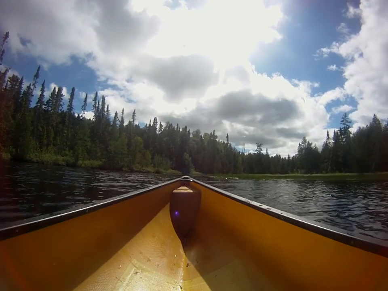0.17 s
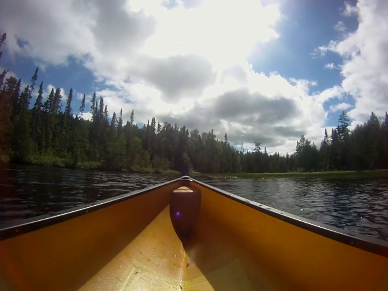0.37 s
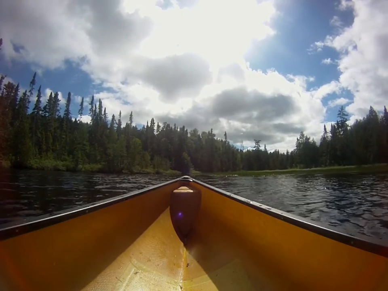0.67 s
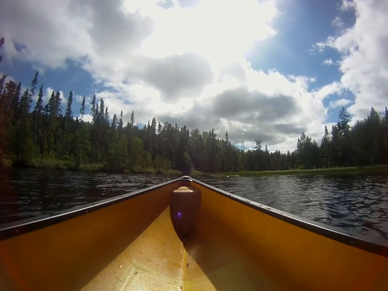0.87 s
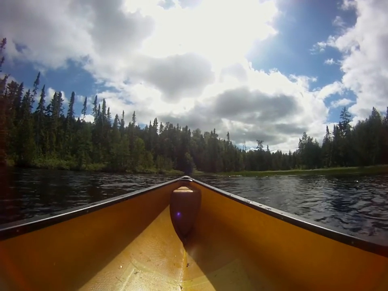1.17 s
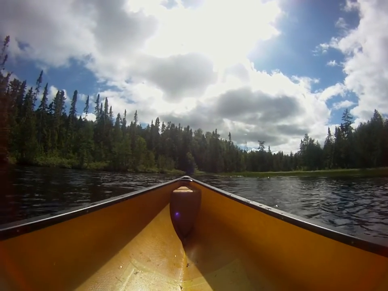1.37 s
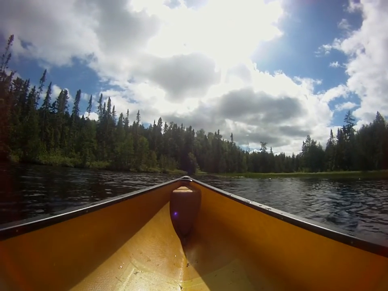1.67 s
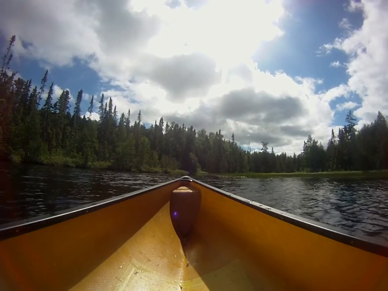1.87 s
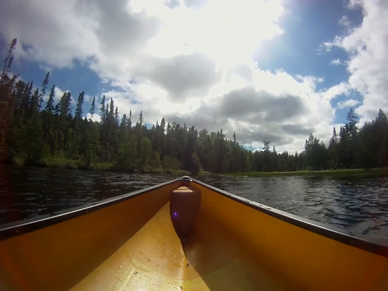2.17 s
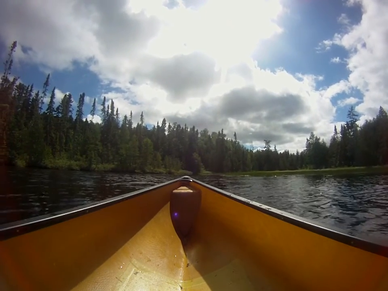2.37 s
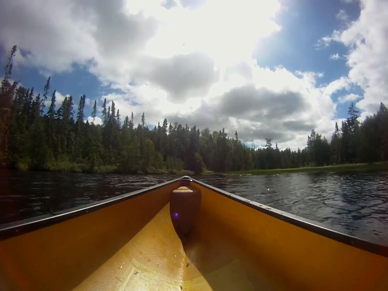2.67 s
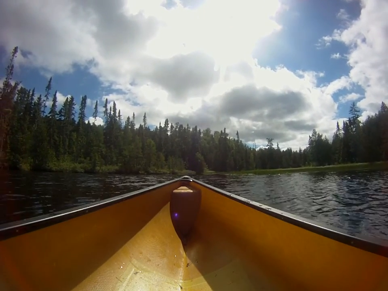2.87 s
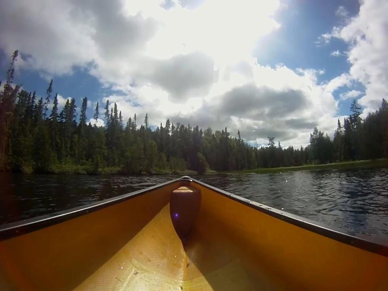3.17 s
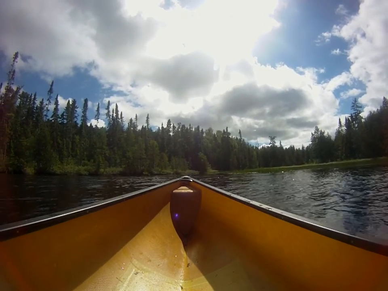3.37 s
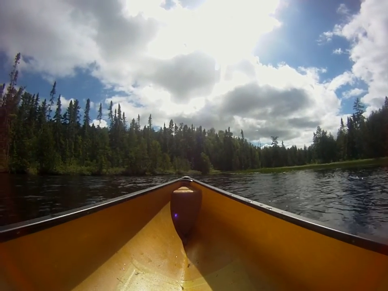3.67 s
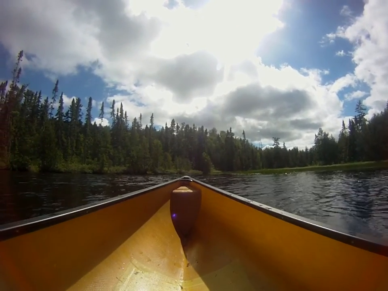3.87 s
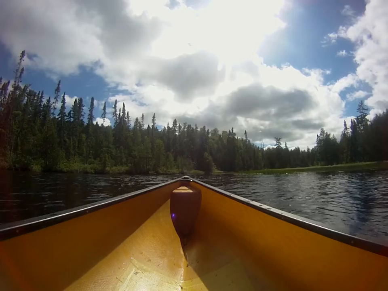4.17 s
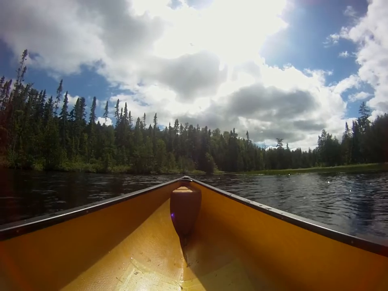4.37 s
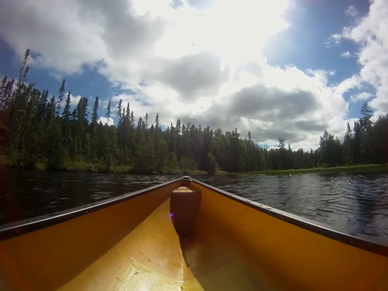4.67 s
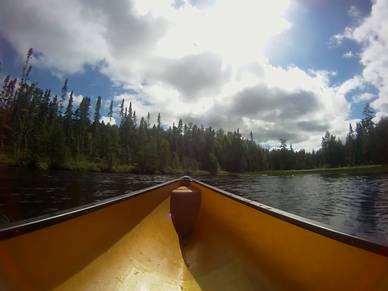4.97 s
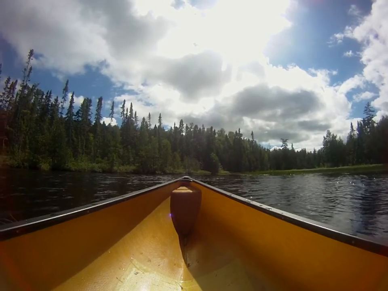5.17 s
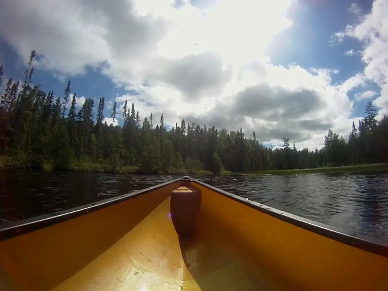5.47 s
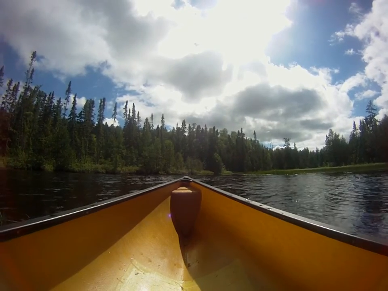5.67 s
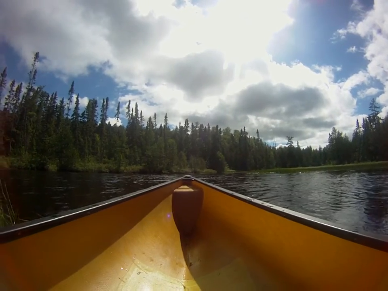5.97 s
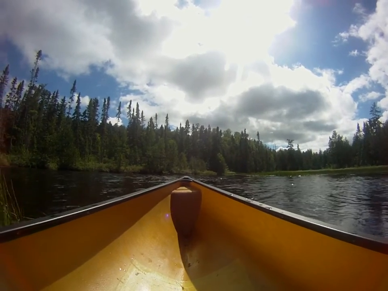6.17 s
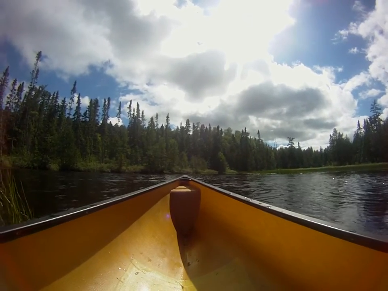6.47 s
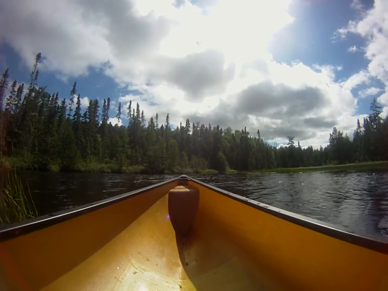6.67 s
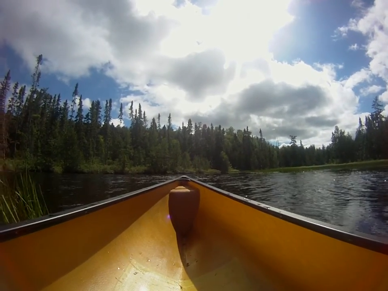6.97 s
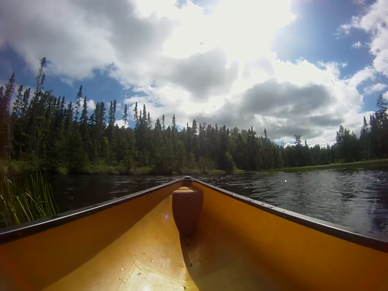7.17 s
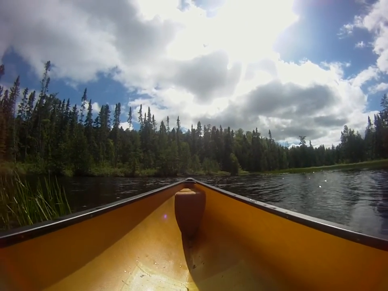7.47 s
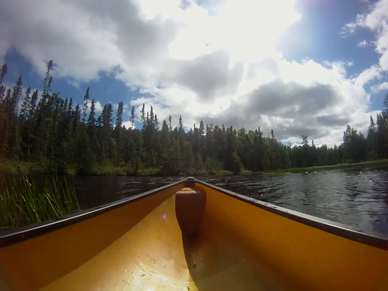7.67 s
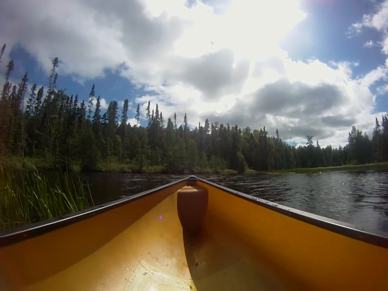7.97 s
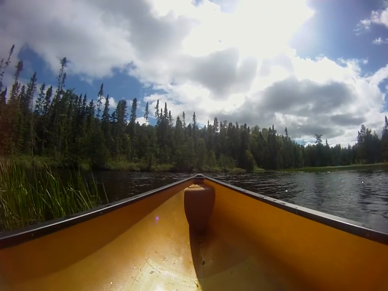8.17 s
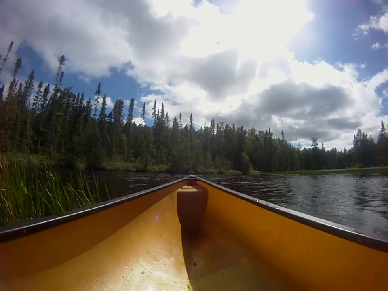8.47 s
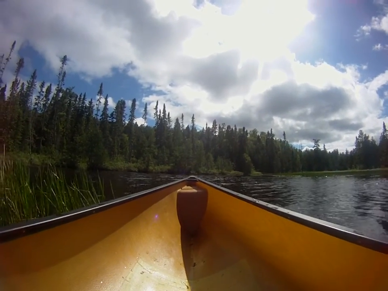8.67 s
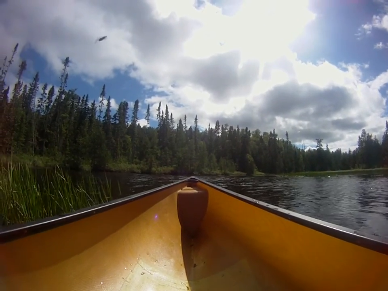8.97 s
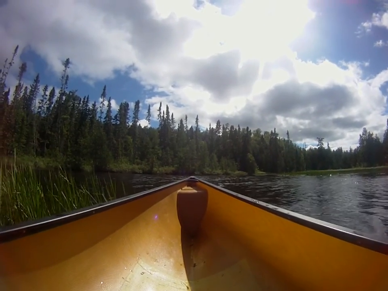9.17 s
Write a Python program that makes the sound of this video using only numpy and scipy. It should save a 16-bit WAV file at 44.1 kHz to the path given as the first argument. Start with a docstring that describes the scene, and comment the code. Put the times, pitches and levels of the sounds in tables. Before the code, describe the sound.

Outdoors in a canoe, heard from inside a sealed plastic case, dry and extremely close. From 0 to 1 s there is low hiss, a very faint high whine and tiny watery plinks. At 1.3 s a dull, hollow hull knock sounds, with a weaker one at 1.7 s. From 2 to 5 s, soft short scuffs of skin and cloth come and go with barely audible ticks. Rubbing grows from 5 s; a sharp knock with a low jolt lands at 5.5 s, and faint squeaks follow around 6 s. Knocks return at 7.0 and 7.3 s over slow low rumbling. From 7.5 s the joint creaks in buzzing bursts and sharp clicks, spaced clicks getting louder from 7.9 s. At 8.3 s a violent distorted snap clips the microphone. Hard clacks, rattles, boxy thuds and scuffs follow, strongest at 8.7 and 9.0 s, until the end at about 9.3 s.

```python
"""Handling noise in a sealed plastic case

A small camera in a sealed case, clamped in a canoe on a calm lake, is handled. Rubbing, knocks and the
stick-slip of the case's joint force the shell's modes; a hard snap follows, with microphone overload around it.
The case also thuds and squeaks as a whole. The hull booms twice as decaying sines, drops plink as short rings,
and filtered noise makes the slow rocking, the hiss and a faint whine."""
import sys
import numpy as np
from scipy.fft import rfft, irfft, next_fast_len
from scipy.io import wavfile
from scipy.ndimage import map_coordinates

SR = 44100
rng = np.random.default_rng(int(sys.argv[2]) if len(sys.argv) > 2 else 0)


def dump_mix(stems):
    """Bounce the given channels to the path in sys.argv[1] as a 16-bit WAV at rate SR."""
    frames = np.atleast_2d(stems).T  # one column per channel
    limited = np.clip(frames, -1, 1)  # hard clip at full scale
    pcm = np.round(limited * 32767).astype(np.int16)
    wavfile.write(sys.argv[1], SR, pcm)


N = 411894  # length in samples

# Joint creaking fast. Each row: time in seconds, mean slips a second, relative level in dB.
CREAK = [(7.522, 265, -30.5), (7.556, 342, -31.5), (7.585, 400, -37), (7.61, 278, -29.5),
         (7.64, 236, -44.5), (7.69, 254, -31), (7.74, 200, -38), (7.76, 230, -29), (7.85, 150, -30.5),
         (7.884, 150, -27)]
# Single slips of the joint. Each row: time in seconds, relative level in dB.
SINGLE_SLIPS = [(7.514, -23.5), (7.6428, -23), (7.65, -17), (7.6533, -15.5), (7.6618, -17), (7.6657, -14),
                (7.677, -22), (7.6824, -14), (7.7015, -22), (7.7207, -22), (7.7299, -19), (7.888, -16),
                (7.8955, -15.5), (7.9057, -13.5), (7.9184, -12.5), (7.9358, -13), (7.962, -13),
                (8.0025, -14), (8.0603, -11), (8.1095, -12.5), (8.1361, -11.5), (8.1583, -12.5),
                (8.1764, -13), (8.195, -12), (8.2204, -14), (8.24, -16), (8.2562, -12.5), (8.2732, -13.5),
                (8.2839, -18), (8.29, -7)]
# Where slips bear on the shell. Each row: time in seconds, then low, high and top family in dB.
SLIP_BEARING = [(7.51, -9.5, 0.5, -23), (7.62, -9, -1, -30), (7.66, -8, -7, -42), (7.74, -7, -6, -20),
                (7.9, -14.5, -6, -21), (8.29, -8.5, -6, -19.5)]
# The joint letting go. One row: start in seconds, end in seconds, force in dB.
SNAP = (8.2937, 8.2978, 0)
# Knocks and ticks on the shell. Each row: time in seconds, relative level, low and high family in dB.
KNOCKS = [(1.265, -29, -20, -25), (1.6843, -40, -10, -31), (2.8614, -44.5, -18, -33),
          (3.0438, -45.5, -9, -15), (3.898, -57, -29, 1), (5.249, -45, -2, -5), (5.403, -40, -21, -8),
          (5.5197, -25.5, 3, -39), (5.5228, -14, -18, -8.5), (6.512, -54, 5, -13), (6.71, -49.5, -2, -7),
          (6.912, -44, -16, -0.5), (6.9548, -21, -9, -33), (7.282, -20.5, -10.5, -38),
          (7.3544, -31, -1, -21), (7.451, -36, -14.5, -8), (8.327, -17, -10, 0), (8.336, -12, -8.5, -9.5),
          (8.596, -30, -5, -16), (8.6731, -17, -6, -3), (8.6778, -16.5, -10, -7), (8.6905, -5, -12.5, -1.5),
          (8.7532, -20.5, -10.5, -7.5), (8.7698, -23, -4, -16), (8.7793, -19.5, -4, -4.5),
          (8.7875, -17.5, -5, -7.5), (8.8167, -26, -5.5, -9), (8.856, -42, -3, -4), (8.9107, -30, -8, -22),
          (8.9325, -32.5, 1, -4), (8.9384, -20, -3, -5.5), (8.982, -7, -12, -7.5), (9.009, -30, 6, -9),
          (9.0256, -9, -6, -7.5), (9.0736, -28.5, -6, -24), (9.18, -24, -7, -5), (9.1902, -34, -2.5, -14),
          (9.2585, -26, -9.5, -19), (9.2653, -29, -3.5, -12), (9.2723, -17, -14.5, -5),
          (9.315, -42, -6, -16)]
# Strokes of skin and cloth. Each row: start in seconds, length in seconds, crest as a share of the length,
# relative level in dB, then low, high and top family in dB.
STROKES = [(2.051, 0.05, 0.22, -50.5, -25, 1, -23), (2.109, 0.21, 0.31, -46.5, -20.5, -1, -12),
           (2.29, .1, 0.55, -51, -15, -4, -14), (2.39, 0.25, 0.15, -64, -20, 6, 3),
           (2.71, 0.1, 0.56, -57.5, -28, -3, -19), (2.889, 0.042, 0.38, -55.5, -5, -4, -24),
           (3.08, 0.2, 0.52, -49, -14, 1, -6.5), (3.22, 0.14, 0.58, -50, -12, 1.5, -17),
           (3.962, 0.057, 0.43, -53, -16, 4.5, -9), (4.31, 0.055, 0.76, -62.5, -5, -3, -22),
           (4.48, 0.13, 0.49, -53, -10.5, 4.5, -0.5), (4.93, 0.18, 0.39, -59.5, -20, 2, -1),
           (5.11, .07, 0.89, -59, -16, 7, 7), (5.18, 0.059, 0.39, -42.5, -13, 4.5, -1),
           (5.269, 0.088, 0.46, -49.5, -14, 5, -10), (5.4, 0.29, 0.52, -50.5, -20, 2.5, -7),
           (5.62, 0.18, 0.3, -54.5, -4.5, 11, -1.5), (5.769, 0.14, 0.27, -44.5, -13.5, 4.5, -19),
           (5.909, 0.049, 0.9, -38, -9, -0.5, -12), (6.05, 0.088, 0.26, -52, -1.5, 0, -20),
           (6.19, 0.16, 0.23, -48, -11.5, -0.5, -18), (6.7, .13, 0.47, -60, -1, 2.5, -22),
           (7.122, 0.19, 0.26, -43, -18, 2.5, -25), (7.349, 0.12, 0.19, -44.5, -12, -2.5, -28),
           (7.47, 0.056, 0.76, -42, -6.5, -7, -29), (8.3, 0.065, 0.17, -50.5, -2, 4, -18),
           (8.42, 0.12, 0.35, -60, 14, 4, -20), (8.56, 0.07, 0.33, -47, 5, -2.5, -28),
           (8.64, 0.042, 0.68, -50.5, 7.5, 5, -18), (8.738, 0.098, 0.22, -45.5, 5, -1.5, -23),
           (8.845, 0.042, .3, -58, 9.5, -1, -22), (8.92, 0.054, 0.38, -52, 1, -1, -24),
           (8.99, 0.069, 0.25, -43, 7, -1, -22), (9.061, 0.16, 0.34, -48.5, -0.5, 0.5, -20),
           (9.26, 0.063, 0.44, -48, 6, -18, -26)]
# A resting hand. Each row: time in seconds, relative level in dB.
RESTING_HAND = [(0, -74.5), (1, -81), (3.5, -74.5), (4.4, -69), (5.1, -67.5), (5.36, -90), (5.5, -63),
                (6.45, -63), (6.86, -62), (7.1, -56), (7.5, -61.5), (7.9, -70), (8.3, -65), (9.34, -62)]
# The resting hand in each family of modes, low to top, in dB.
RESTING_BALANCE_DB = [-6, -2.5, -5, -23.5]
# Squeaks under a sliding finger. Each row: time in seconds, upper and lower mean pitch in Hz, relative level in dB.
SQUEAKS = [(5.82, 2370, 1630, -64), (5.95, 2080, 1566, -60), (6.11, 1980, 1503, -60),
           (6.18, 2280, 1470, -64), (6.27, 1930, 1490, -71)]
# Four families of shell modes, low to top. Each row: centre in Hz, width in Hz, relative level in dB.
SHELL_MODES = [
    [(783, 88, 3), (960, 65, 2.5), (1190, 233, -2.5)],
    [(1606, 86, 2), (2199, 169, 0.5), (2508, 130, -1.5), (2760, 220, -1), (3222, 258, -1.5)],
    [(3564, 162, -5.5), (4223, 353, -6), (4650, 190, -2), (5065, 338, -4), (5720, 136, -9),
     (6085, 160, -14.5)],
    [(6430, 260, 5), (7520, 950, -2.5), (8840, 650, -7), (11220, 1540, -10.5), (13800, 610, -14)],
]
# Feeding of three modes as the hand shifts. Each row: time in seconds, then 1.6, 2.2 and 3.6 kHz mode in dB.
HAND_SHIFT = [(7.5, -1, 5, 9), (7.63, -2, -1, 9), (7.66, 4, 5.5, -10), (7.72, 0, 0.5, 3),
              (7.79, -5.5, 0, 8), (7.88, -1, -4.5, 9), (7.97, -4.5, -4.5, 2.5), (8.29, -5.5, -5, 2),
              (8.36, -10.5, -4.5, 5), (9.34, -15, 1, 3)]
# Blows on the hull. Each row: time in seconds, relative level in dB.
HULL_BLOWS = [(1.263, -27.5), (1.684, -36)]
# Modes of the hull. Each row: frequency in Hz, relative level in dB, time to fall 60 dB in seconds.
HULL_MODES = [(44.7, -16, 0.62), (84.7, -7, 0.61), (184.7, -13.5, 0.48), (257.6, 3, 0.2), (363.6, 4, 0.2),
              (730, 10.5, 0.073)]
# Drops plinking against the hull. Each row: time in seconds, relative level in dB, pitch in Hz.
DROPS = [(0.094, -50.5, 845), (0.248, -52.5, 1590), (0.418, -49.5, 2040), (0.932, -50, 2050)]
# Fixed pitches that every drop also sets ringing, in Hz.
PLINK_HZ = [791, 1588, 2065, 2325]
# The boat rocking. Each row: time in seconds, relative level in dB.
ROCKING = [(0, -90), (1.6, -80), (2.1, -77), (2.7, -84), (5, -83), (5.3, -70), (6.9, -66.5), (7.6, -68.5),
           (9.34, -57.5)]
# The case jolted in its clamp. Each row: time in seconds, relative deep level in dB, body above it in dB.
JOLTS = [(5.523, -27.5, -10), (7.357, -48, 7), (7.279, -42, 2.5), (7.659, -54, 21.5), (8.32, -29, 3),
         (8.339, -34, 10), (8.589, -45, 15), (8.687, -42, 17), (8.771, -41, 4), (8.94, -45.5, 13.5),
         (9.027, -43, 18), (9.269, -48, 4)]
# Spectrum of the hiss. Each row: frequency in Hz, relative density in dB.
HISS_SPECTRUM = [(35, -30), (60, -3.5), (1040, -5), (1620, 1), (2460, -6), (7730, -2), (9100, -7.5),
                 (14900, -7), (15900, -20)]
# Likeness of the two channels of hiss. Each row: frequency in Hz, correlation from 0 to 1.
HISS_LIKENESS = [(60, 0.14), (3770, 0.96), (15000, 0.63)]
# Overloaded microphone sticking. Each row: start in seconds, end in seconds, left offset, spike on entry.
STUCK = [(8.2916, 8.2935, -.1, -.9), (8.2985, 8.301, -.1, -.9), (8.329, 8.3377, .1, .3),
         (8.3382, 8.3388, 0, -.95)]

CONTACT_T60, TAIL_T60 = 0.015, 0.038  # s to fall 60 dB: a contact, and loose parts chattering on after it
TAIL_DB = -16.5  # that chatter relative to the contact
SOFT_S = .00002  # push time in s at a high-family level of 0 dB; duller contacts push longer
SWELL_DB, EDGE_S = 8.5, 0.013  # fall from a stroke's crest to its ends; s to touch down and lift off
HELD_DB, LOOSE_DB = 2, 14  # body resonance before and after the start of the snap
MUFFLE_DB = -6  # feed of the lowest shell mode once the case is loose in the hand
TOP_HZ = 16000  # band edge, at half amplitude


def amp(db):
    """Decibels are twenty times the logarithm of an amplitude ratio."""
    return 10 ** (np.asarray(db) / 20)


def unit(x):
    """Dividing by the root mean square gives unit power."""
    return x / np.sqrt(np.mean(x ** 2) + 1e-20)


def along(points, hz):
    """Spectral values are interpolated on a logarithmic frequency axis."""
    f, v = np.transpose(points)
    return np.interp(np.log(hz + 1), np.log(f + 1), v)


def curves(rows, silent):
    """Each column is interpolated linearly in time, with the silent value outside the rows."""
    t = np.arange(N) / SR
    times, *columns = np.transpose(rows)
    return np.array([np.interp(t, times, c, left=silent, right=silent) for c in columns])


def wobble(rate):
    """A spline through independent random knots, rate knots a second, varies smoothly."""
    knots = rng.standard_normal(int(N * rate / SR) + 4)
    return map_coordinates(knots, [np.arange(N) * rate / SR])


def filtered(x, response):
    """Linear filtering is multiplication of the spectrum by a complex response."""
    m = next_fast_len(N + SR // 2)
    return irfft(rfft(x, m) * response(np.fft.rfftfreq(m, 1 / SR)), m)[..., :N]


def resonance(hz, centre, width):
    """A damped resonator has unit gain at its centre and falls off on both sides."""
    damping = 1j * hz * width
    return damping / (centre ** 2 - hz ** 2 + damping)


def joint():
    """Stick-slip friction: each release is an impulse of force with a weaker rebound; fast slips also chatter."""
    rate, creak_db = curves(CREAK, 0)
    low_db, high_db, top_db = curves(SLIP_BEARING, 0)
    bearing = amp([low_db, np.zeros(N), high_db, top_db])
    phase = np.cumsum(rate * amp(1.5 * wobble(200))) / SR
    releases = np.diff(np.floor(phase), prepend=0) * np.sqrt(SR / (rate + 1))
    # each release bears a little elsewhere
    releases = releases * amp(2.4 * np.array([wobble(300) for _ in SHELL_MODES]))
    chatter = .5 * amp(-14 * (phase % 1)) * rng.standard_normal((4, N))
    force = (releases + 1.7 * chatter) * amp(creak_db) * (rate > 0)
    for s, db in SINGLE_SLIPS:
        force[:, round(s * SR)] += amp(db + 13.5)
    force = force * bearing
    rebound = 0.19 * np.roll(force, round(.0007 * SR), 1)
    return force + rebound


def snap():
    """Sudden release of strain: a few milliseconds of uneven noise excite a broad 3 kHz resonance."""
    t = np.arange(N) / SR
    start, end, force_db = SNAP
    burst = ((t > start) & (t < end)) * rng.standard_normal(N) * amp(6.4 * wobble(1200))
    return amp(force_db) * filtered(burst, lambda hz: resonance(hz, 3000, 3500))


def knocks():
    """Impact: a ragged force dies away; dull contacts push softly and harder blows reach the top modes."""
    force, t = np.zeros((4, N + SR)), np.arange(SR // 10) / SR
    decay = amp(-60 * t / CONTACT_T60) + amp(TAIL_DB - 60 * t / TAIL_T60)
    dying = decay * np.minimum(1, t / 0.0005)
    ragged = amp(2.96 * np.tile(wobble(500), 2))
    for s, db, low_db, high_db in KNOCKS:
        start = round(s * SR)
        rattle = rng.standard_normal(len(t)) * dying * ragged[start:][:len(t)]
        rattle = rattle / np.linalg.norm(rattle)
        push = np.exp(-t[:SR // 400] / (SOFT_S * amp(-.7 * high_db)))
        soft = np.convolve(rattle, push / np.linalg.norm(push))[:len(t)]
        top_db = 1.33 * high_db + 15 + 0.46 * db
        levels_db = db + np.array([low_db + 23.0, 16, high_db + 23.0, top_db])
        families = np.array([rattle, soft, rattle, rattle])
        force[:, start:][:, :len(t)] += families * amp(levels_db)[:, None]
    return force[:, :N]


def rubbing():
    """Sliding friction: dense tiny catches are noise of flickering strength, partly common to all families."""
    t = np.arange(N) / SR
    resting = amp(curves(RESTING_HAND, -120)[0] + 4.6 * wobble(8.7))
    power = np.outer(amp(RESTING_BALANCE_DB), resting) ** 2
    for s, length, crest, db, low_db, high_db, top_db in STROKES:
        crest_s = s + np.clip(crest, .05, .95) * length
        knots = [s - EDGE_S, s, crest_s, s + length, s + length + EDGE_S]
        span = slice(*np.searchsorted(t, [knots[0], knots[-1]]))
        swell_db = np.interp(t[span], knots, [-40, -SWELL_DB, 0, -SWELL_DB, -40])
        power[:, span] += np.outer(amp([low_db, 0, high_db, top_db]), amp(db + swell_db)) ** 2
    together = 1.5 * wobble(30) + 2 * wobble(400)
    own = 2.7 * np.array([wobble(25) for _ in SHELL_MODES])
    flickering = amp(together + own) * rng.standard_normal((4, N))
    grit = np.array([unit(v) for v in flickering])
    grit[-1] = unit(np.diff(grit[-1], 2, prepend=[0, 0]))  # the finest catches are the sharpest
    return np.sqrt(power) * grit


def squeak():
    """Frictional oscillation: two tones waver in pitch and level under the sliding finger."""
    *tones_hz, db = curves(SQUEAKS, -120)
    total = 0
    for hz in tones_hz:
        cycles = np.cumsum(hz * (1 + .03 * wobble(90))) / SR
        total = total + amp(db + 5 * wobble(30)) * np.sin(2 * np.pi * cycles)
    return total


def shell(forces):
    """Modal superposition: each force rings one family, and each mode is fed more or less as the grip moves."""
    m = next_fast_len(N + SR // 2)
    f, total = np.fft.rfftfreq(m, 1 / SR), 0
    low, middle, high, _ = SHELL_MODES
    muffle_db = MUFFLE_DB * (np.arange(N) / SR > SNAP[0])
    feed_db = dict(zip([middle[0], middle[1], high[0], low[0]], [*curves(HAND_SHIFT, 0), muffle_db]))
    for force, modes in zip(forces, SHELL_MODES):
        # neighbouring modes alternate in sign
        rings = [(-1) ** k * amp(db) * resonance(f, centre, width)
                 for k, (centre, width, db) in enumerate(modes)]
        scale = np.sqrt(np.mean(np.abs(sum(rings)) ** 2))
        for ring, mode in zip(rings, modes):
            fed = force * amp(feed_db.get(mode, 0) + 1.96 * wobble(9))
            total = total + ring / scale * rfft(fed, m)
    return irfft(total, m)[:N]


def body(force):
    """Forced resonance: the whole case thuds dully near 520 Hz, more strongly once loose."""
    gain = amp(np.where(np.arange(N) / SR > SNAP[0], LOOSE_DB, HELD_DB))
    return filtered(gain * force, lambda hz: resonance(hz, 520, 330))


def hull():
    """Free vibration: struck panels ring in low modes that decay exponentially and waver in phase."""
    out, t = np.zeros(N + SR), np.arange(SR // 2) / SR
    for s, db in HULL_BLOWS:
        for hz, mode_db, t60 in HULL_MODES:
            drift = 0.052 * np.cumsum(rng.standard_normal(len(t)))
            decay = amp(db - 13.5 + mode_db - 60 * t / t60)
            out[round(s * SR):][:len(t)] += decay * np.sin(2 * np.pi * hz * t + drift)
    return out[:N]


def drips():
    """Damped ringing: each drop sounds its own pitch and a few fixed ones; a faint early patter thins out."""
    chance = rng.random((90, 3))
    # columns as in DROPS, within the first 0.9 s
    faint = np.transpose([.9 * chance[:, 0] ** 1.3, -72 + 12 * chance[:, 1], 700 + 2400 * chance[:, 2]])
    out, t = np.zeros(N + SR), np.arange(SR // 20) / SR
    rings = np.sin(2 * np.pi * np.outer(PLINK_HZ, t))
    for s, db, hz in [*DROPS, *faint]:
        swell = amp(db + 2.5 - 60 * t / 0.029) * (1 - np.exp(-t / 0.0026))
        others = amp(-8 + 4 * rng.standard_normal(len(rings))) @ rings
        out[round(s * SR):][:len(t)] += swell * (np.sin(2 * np.pi * hz * t) + others)
    return out[:N]


def rocking():
    """Low-passed noise gives slow pressure lumps; decaying noise gives jolts, the deep part stronger at left."""
    lumps = amp(3.5 * wobble(5.9)) * rng.standard_normal(N)
    lumps = unit(filtered(lumps, lambda hz: hz / (hz + 25) / (1 + (hz / 60) ** 2)))
    lumps = lumps * amp(curves(ROCKING, -120)[0])
    shake, t = np.zeros((2, N + SR)), np.arange(SR // 4) / SR
    for s, db, body_db in JOLTS:
        shake[:, round(s * SR):][:, :len(t)] += amp(db + np.array([[0], [body_db]]) - 60 * t / 0.092)
    shake = shake[:, :N] * rng.standard_normal((2, N))
    deep = filtered(shake[0], lambda hz: 1j * hz / (30 + 1j * hz) / (1 + 1j * hz / 90) ** 2)
    thud = amp(11.5) * filtered(shake[1], lambda hz: resonance(hz, 330, 350))
    return amp([[3], [-8]]) * (lumps + amp(30.0) * deep) + thud


def hiss():
    """Partial coherence: sum and difference of two noises give microphone hiss and faint water in stereo."""
    def mid_side(hz):
        turn = np.arccos(np.clip(along(HISS_LIKENESS, hz), -1, 1)) / 2
        return amp(along(HISS_SPECTRUM, hz)) * [np.cos(turn), np.sin(turn)]

    mid, side = filtered(rng.standard_normal((2, N)), mid_side)
    return amp(-69.0) * unit(np.array([mid + side, mid - side]))


def whine():
    """Narrow-band noise: the electronics give a faint hiss around 7.8 kHz."""
    band = filtered(rng.standard_normal(N), lambda hz: 1 / (1 + ((hz - 7800) / 120) ** 2))
    return amp(-91.0) * unit(band)


def scene():
    """Linear superposition: the sounds of case, hull, boat and background add."""
    handling = rubbing() + knocks()
    case = shell(handling + joint()) + body(handling[0])
    case = case + snap() + squeak() + drips() + whine()
    return case + hull() * amp([[1], [-1]]) + rocking() + hiss()


def record(dry):
    """Overload: spikes and held offsets replace the signal, peaks clip, and the band ends sharply."""
    t, out = np.arange(N) / SR, dry.copy()
    for start, end, left_offset, spike in STUCK:
        out = np.where((t > start) & (t < end), [[left_offset], [0]], out)
        peak_s = start - .0003
        fade_s = np.where(t < peak_s, .0001, .0003)
        out = out + spike * np.exp(-np.abs(t - peak_s) / fade_s)
    out = np.clip(out, -.9, .9) - .0001  # tiny steady offset
    return np.clip(filtered(out, lambda hz: 1 / (1 + (hz / TOP_HZ) ** 120)), -1, 1)


dry = scene()
out = record(dry)
dump_mix(out)
```